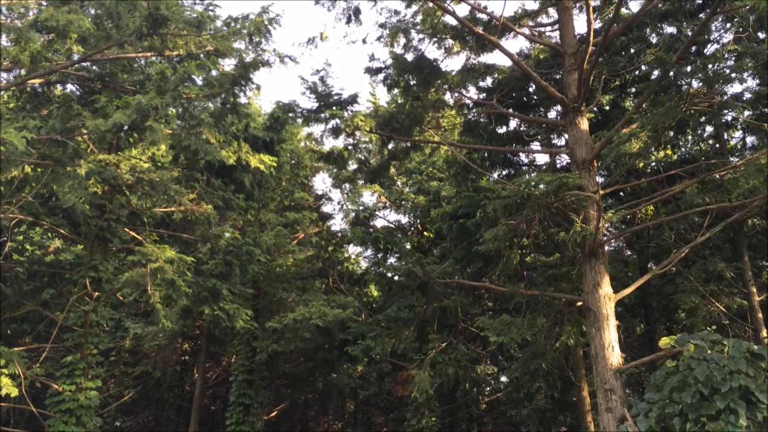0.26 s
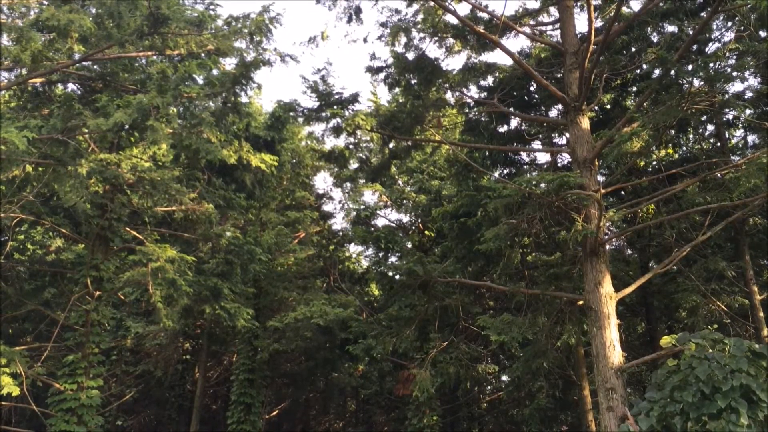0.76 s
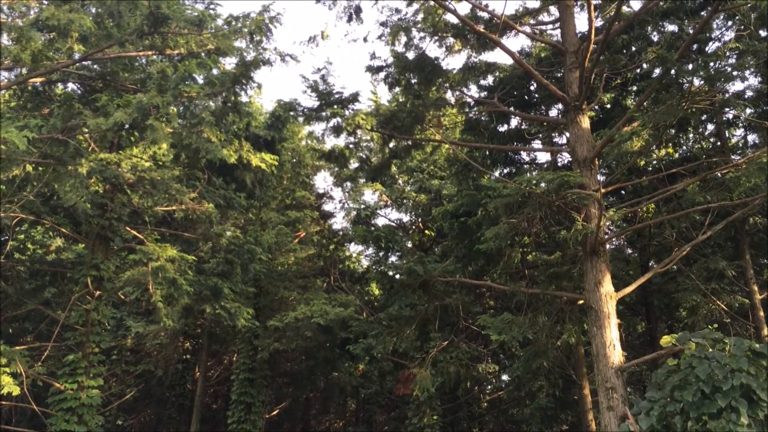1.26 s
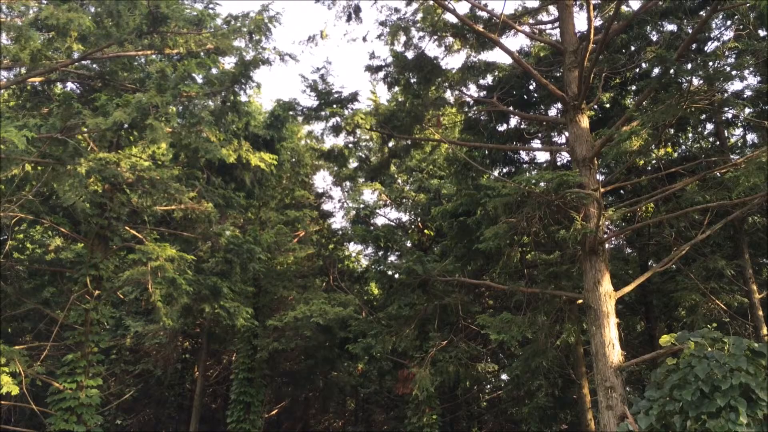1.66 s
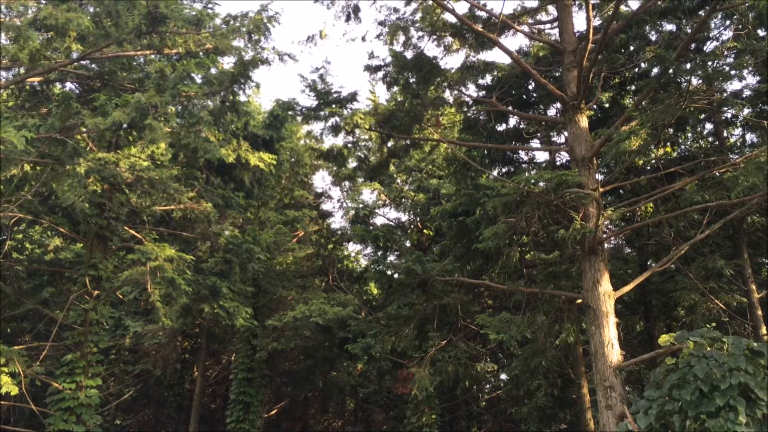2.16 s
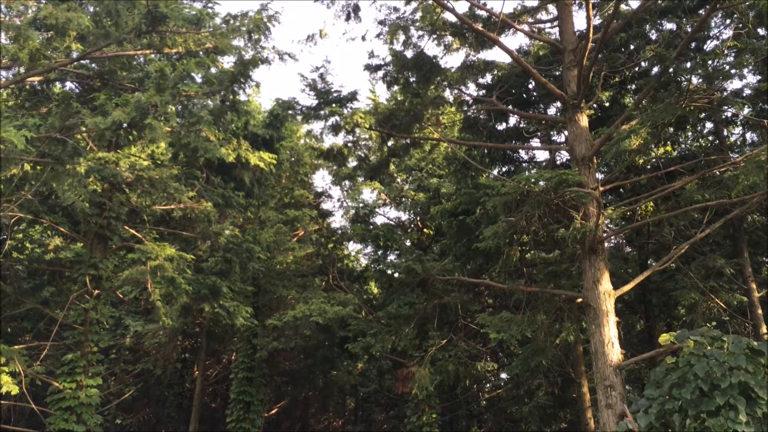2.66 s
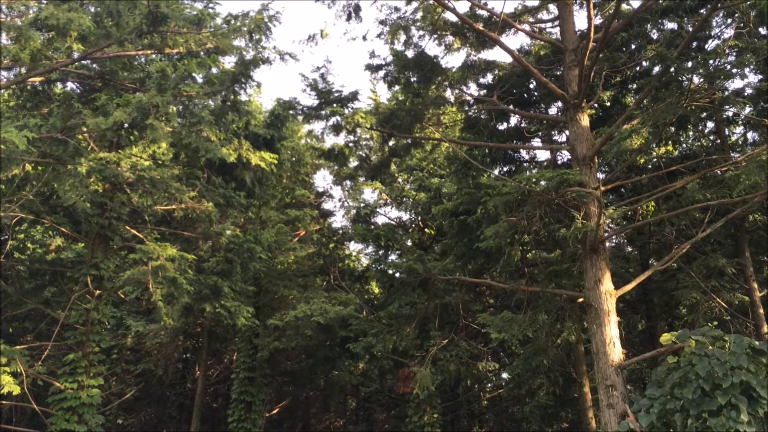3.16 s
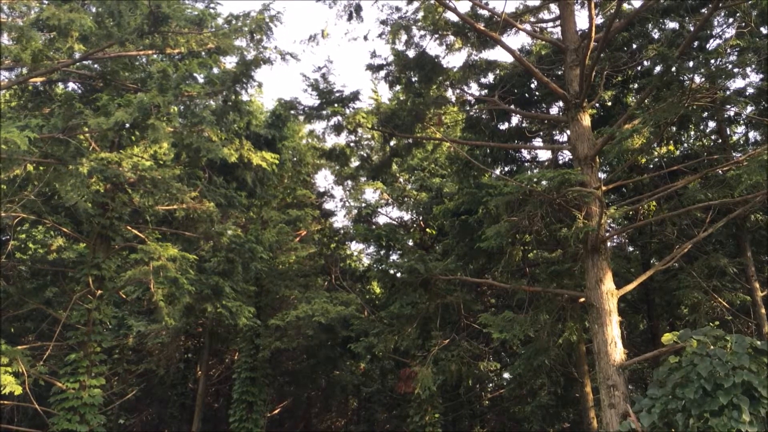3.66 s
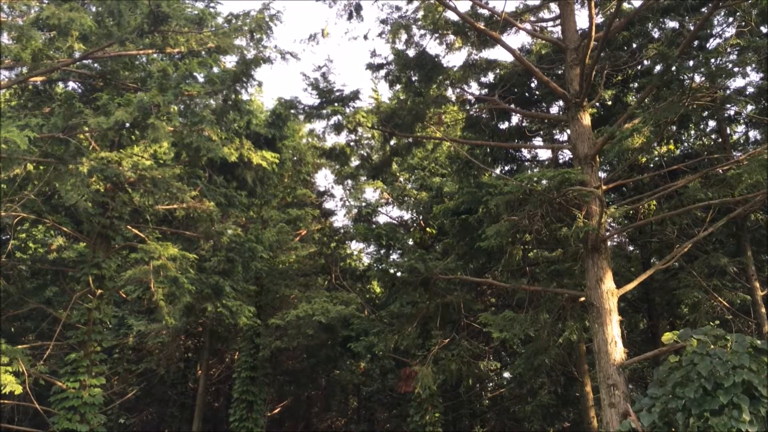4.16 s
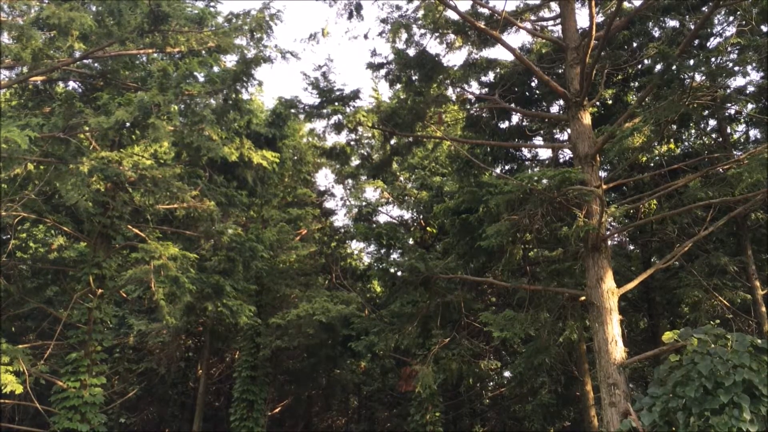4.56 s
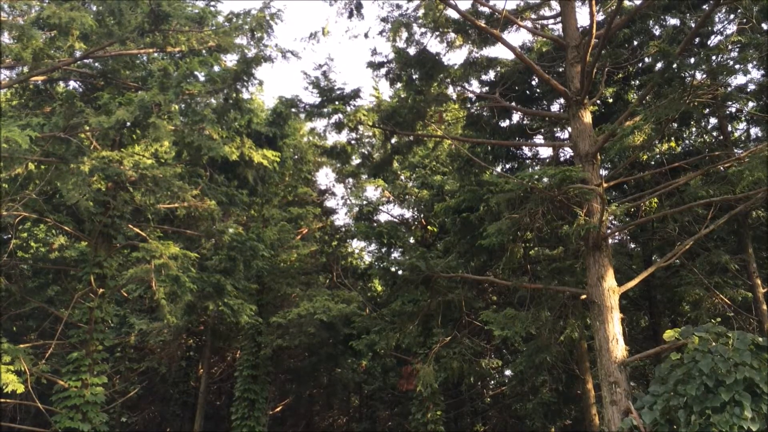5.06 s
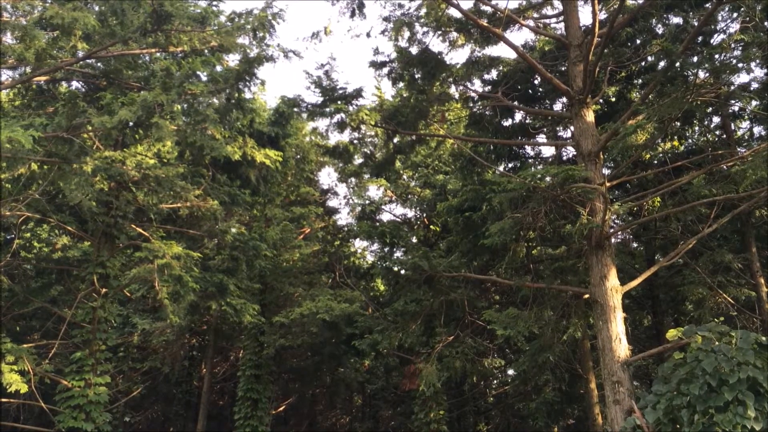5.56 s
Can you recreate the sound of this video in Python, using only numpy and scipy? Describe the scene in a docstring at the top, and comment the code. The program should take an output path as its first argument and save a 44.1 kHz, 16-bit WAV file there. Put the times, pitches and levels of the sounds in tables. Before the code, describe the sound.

A blurred, shrill chorus of far cicadas fills the woods while closer ones enter one after another, each with a rapid pulsing trill that slows and dies away. The strongest calls come in the first half, and a fresh group joins near the end. A light wooden tap sounds near the start, and a thin insect whine comes and goes faintly over a soft hush and distant hum.

```python
"""Cicadas in a wood at dusk: buckling ribs click and ring each abdomen. Near ones sing runs of short
syllables that rise, then slow and sink in pitch; many more blur into a far chorus. Trunks scatter the
calls and let them ring on. Underneath: rib rasp, low rumble, a briefly dipping hush, a far machine's
hum, one light knock on wood and another insect's thin whine."""
import sys
import numpy as np
from scipy import signal
from scipy.fft import rfft, irfft
from scipy.io import wavfile
from scipy.ndimage import uniform_filter1d

SR = 44100
rng = np.random.default_rng(int(sys.argv[2]) if len(sys.argv) > 2 else 0)


def dump(signal):
    """Clip the signal to [-1, 1] and save it as 16-bit WAV at the path in sys.argv[1]."""
    limited = np.clip(np.atleast_2d(signal).T, -1, 1)
    pcm = np.round(limited * 32767).astype(np.int16)
    wavfile.write(sys.argv[1], SR, pcm)


N = 255780
TIME_S = np.arange(N) / SR

# body colours: harmonic number, relative level/dB
HIGH_BODY = [(1, -5), (2, 2), (3, -11), (4, -10), (5, -19.5), (6, -30)]
MIDDLE_BODY = [(1, -6), (2, 1.5), (3, -6.5), (4, -7), (5, -18), (6, -33)]
LOW_BODY = [(1, -1), (2, 0.5), (3, -5), (4, -0.5), (5, -3.5), (6, -23)]
LATE_BODY = [(1, -7.5), (2, 3), (3, -2.5), (4, -6), (5, -19), (6, -24.5)]
SLOW_BODY = [(1, 1), (2, -6.5), (3, -1.5), (4, 1), (5, -8), (6, -21.5)]
FAR_BODY = [(1, -1), (2, 2.5), (3, -6.5), (4, -7.5), (5, -19.5), (6, -28.5)]
# call rhythm: start/s, syllables, first gap/s, slowing/(s/syllable), last-gap drag/s
CALL_BEATS = { "fading": (-.43, 9, .115, 0, 0), "high": (.648, 20, .09, .0019, .152),
              "middle": (1.3, 17, .0847, .004, .112), "slow": (2.699, 10, .1058, .007, .156),
              "back": (3.726, 11, .0868, .0012, .003), "low": (4.545, 10, .0894, .0084, .015),
              "late": (4.758, 10, .0976, .0019, .02), }
# call effort: base f/Hz, base level/dB, warm-up/s, fade/(dB/s), accent/dB, accent age/s,
# first brightness/dB, target brightness/dB, opening/s
CALL_EFFORTS = { "fading": (2229, -48, 0.1, 8.5, 4, .2, -4, 4, 0.5),
                "high": (2349, -38, .04, 2.8, 4.5, .22, 1.5, 17, 1.9),
                "middle": (2134.5, -33, 0.12, 4, 0.5, 0, -38, 4.5, 0.53),
                "slow": (2233.5, -45, 0.2, 6.5, 0.5, .2, -3.5, 5.5, 1),
                "back": (2190.5, -42, 0.16, -0.5, 3.5, .43, -10, -9, .5),
                "low": (2045, -41, .03, 1.5, 0.5, .2, -9, -2, 0.4),
                "late": (2272, -39, .19, 4, 4, .5, -14, 11, .45), }
# call voice: body, buzz depth, jitter/rad, click sag/rad, syllable/s at a 0.1 s gap,
# stretch exponent, side mode/dB at 0 dB brightness
CALL_VOICES = { "fading": (SLOW_BODY, 0.67, 0.097, 0.28, 0.054, 0.76, -60),
               "high": (HIGH_BODY, .33, .08, .2, .052, .2, -18),
               "middle": (MIDDLE_BODY, 0.32, .2, 0.07, 0.043, 0.25, -60),
               "slow": (SLOW_BODY, 0.46, 0.099, .16, 0.045, 0.56, -60),
               "back": (FAR_BODY, 0.28, 0.33, 0.083, 0.032, .3, -63),
               "low": (LOW_BODY, 0.33, 0.16, 0.024, 0.037, 0.41, -60),
               "late": (LATE_BODY, .4, .09, .15, .05, .4, -60), }
# far chorus swell: t/s, level/dB before trim
CHORUS_SWELL = [(0.0, -43), (0.26, -43.5), (1.57, -38), (2.18, -38), (3.18, -43.5), (3.34, -44), (5.3, -39),
                (5.8, -40.5)]
# rib rasp spectrum: f/Hz, relative density/dB
RASP_SPECTRUM = [(1400, -52), (1850, 11.5), (2500, 3.5), (3200, -6), (4000, -3), (5400, 5.5), (6400, 3.5),
                 (7300, 4), (8400, 10.5), (9000, 1.5), (9500, -15), (10800, 2.5), (11800, -33),
                 (15000, -20)]
# distant rumble and hush of the wood: f/Hz, relative density/dB
HUSH_SPECTRUM = [(20, -31), (40, -14.5), (68, 0.5), (95, -1), (150, -5.5), (220, -5), (300, -11.5),
                 (480, -14.5), (800, -19), (1100, -17), (1500, -19.5), (3000, -28), (10000, -74)]
# far machine hum: f/Hz, level/dB
HUM_TONES = [(93, -66), (213, -65), (366, -74), (538, -82)]
# dips in hush and rasp: t/s, half length/s, gain/dB
HUSH_DIPS = [(.472, .014, -20), (2.0, .008, -5), (2.36, .012, -7), (2.68, .008, -6), (3.05, .03, -4),
             (4.003, .022, -24), (4.215, .007, -7)]
# wood modes: f/Hz, relative level/dB, T60/s
WOOD_MODES = [(635, 4, 0.037), (707, -0.5, 0.034), (940, -5, 0.038)]
# insect whines: peak t/s, half length/s, f/Hz, level/dB
INSECT_WHINES = [(.95, .35, 7636, -60), (2.55, .14, 7510, -63), (3.28, .28, 7505, -64)]

COLD_DB, COLD_FLAT = -7, 0.0202  # calls start soft and flat (share of pitch)
ACCENT_HALF_S, ACCENT_HZ_PER_DB, SINK_HZ_PER_S = .13, 1.5, 26.2
SCOOP, SCOOP_S, DROOP = .012, 0.0093, 0.0077  # syllables start and end flat (shares of pitch)
CHORUS_TRIM_DB = -1.07
SONG_LOW_HZ, TOP_HZ = 1600, 15400


def undb(db):
    """Decibels to gain."""
    return 10 ** (np.asarray(db) / 20)


def unit(x):
    """Scale to rms 1."""
    return x / np.sqrt(np.mean(x ** 2))


def walk(rate_hz, size=N):
    """Smooth random drift, spread about 1."""
    at = np.arange(size) / SR * rate_hz + rng.random()
    knots = int(at[-1]) + 2
    return 1.2 * np.interp(at, np.arange(knots), rng.standard_normal(knots))


def noise(spectrum):
    """Shaped noise, rms 1."""
    hz, db = np.transpose(spectrum)
    bins_hz = np.arange(N // 2 + 1) * SR / N
    gain = undb(np.interp(np.log(bins_hz + 1), np.log(hz), db))
    return unit(irfft(rfft(rng.standard_normal(N)) * gain, N))


def syllable_times(start_s, count, gap_s, slowing_s, drag_s):
    """Onsets and gaps: slowing lengthens each gap, drag mainly the last few."""
    k = np.arange(count - 1)
    gaps_s = gap_s + slowing_s * k + drag_s / (count - 1 - k) ** 2
    return start_s + np.append(0, np.cumsum(gaps_s)), np.append(gaps_s, gaps_s[-1])


def effort(age_s, hz, db, warm_s, fade_db_per_s, accent_db, accent_s, first_db, target_db, opening_s):
    """The singer warms up to an accent, then tires and sinks in pitch while its tone opens."""
    cold = np.exp(-age_s / warm_s)
    lift_db = accent_db * np.exp(-((age_s - accent_s) / ACCENT_HALF_S) ** 2)
    pitch_hz = hz * (1 - COLD_FLAT * cold) + ACCENT_HZ_PER_DB * lift_db - SINK_HZ_PER_S * age_s
    level_db = db + COLD_DB * cold + lift_db - fade_db_per_s * age_s
    bright_db = target_db + (first_db - target_db) * np.exp(-age_s / opening_s)
    return pitch_hz, level_db, bright_db


def tymbal(hz, body, bright_db, buzz, jitter_rad, sag_rad, click_hz=335):
    """The abdomen rings at hz; each rib click swells the tone and pulls its pitch down."""
    size = len(hz)
    click_rad = 2 * np.pi * (np.cumsum(click_hz * (1 + .18 * walk(150, size))) / SR + rng.random())
    ring_rad = 2 * np.pi * (np.cumsum(hz) / SR + rng.random())
    phase_rad = ring_rad - sag_rad * np.sin(click_rad) + jitter_rad * walk(600, size)
    strength = np.exp(buzz * np.cos(click_rad) + .16 * walk(330, size))
    tone = 0
    for harmonic, db in body:
        lift_db = bright_db * np.clip((harmonic - 2) / 3, 0, 1)
        tone = tone + undb(db + lift_db) * np.sin(harmonic * phase_rad)
    return unit(strength) * tone


def cicada(beat, drive, voice, attack_s=0.011, release_s=0.025, bite_db=3):
    """One near call: syllables start bright, scoop up to pitch and lengthen as the rhythm slows."""
    body, buzz, jitter_rad, sag_rad, syllable_s, stretch, side_db = voice
    out = np.zeros(N + SR)
    t = np.arange(SR // 5) / SR
    starts_s, gaps_s = syllable_times(*beat)
    contours = effort(starts_s - starts_s[0], *drive)
    for start_s, gap_s, hz, level_db, bright_db in zip(starts_s, gaps_s, *contours):
        if start_s < 0:
            continue
        length_s = syllable_s * (np.clip(gap_s, .08, .2) * 10) ** stretch
        swell = np.clip(t / attack_s, 0, 1) * np.clip((length_s - t) / release_s + .5, 0, 1)
        droop = DROOP * (t > length_s / 2) * (1 - swell)
        pitch_hz = hz * (1 - SCOOP * np.exp(-t / SCOOP_S) - droop)
        treble_db = bright_db + bite_db * (1 - 2 * t / length_s)
        tone = tymbal(pitch_hz, body, treble_db, buzz, jitter_rad, sag_rad)
        # weak mode a fourth up, clearest in mellow syllables
        side_hz = pitch_hz * 1.34 + 30 * walk(200, len(t))
        side = undb(side_db - bright_db) * swell ** 2 * np.sin(2 * np.pi * np.cumsum(side_hz) / SR)
        i = int(start_s * SR)
        out[i:i + len(t)] += undb(level_db) * swell * (tone + side)
    return out[:N]


def woods(x, direct, wet_db, t60_s, treble_db, build_s=0.018):
    """Trunk echoes build and decay; foliage absorbs their treble."""
    t = np.arange(SR) / SR
    echoes = rng.standard_normal(SR) * (1 - np.exp(-(t / build_s) ** 2)) * undb(-60 * t / t60_s)
    echoes /= np.sqrt(np.sum(echoes ** 2))
    foliage = undb(np.interp(np.arange(SR // 2 + 1), [4700, 11000], [0, treble_db]))
    echoes = irfft(rfft(echoes) * foliage, SR)
    primed = np.concatenate([x[:SR][::-1], x])  # the wood already rings at t = 0
    return direct * x + undb(wet_db) * signal.fftconvolve(primed, echoes)[SR:SR + N]


def chorus(centre_hz, spread, bright_db, count):
    """Far cicadas, each on its own pitch and beat, blurred by echoes."""
    out = 0
    for rank in (np.arange(count) + .5) / count * 2 - 1:
        hz = centre_hz * (1 + spread * np.arctanh(.9 * rank) + .011 * walk(2))
        beat_hz = rng.uniform(7, 10.5) * (1 + 0.0604 * walk(0.97))
        beats = np.cumsum(beat_hz) / SR + rng.random()
        syllables = np.maximum(np.sin(2 * np.pi * beats) + 0.16, 0) * undb(1.04 * walk(0.89))
        out = out + syllables * tymbal(hz, FAR_BODY, 0, buzz=0.13, jitter_rad=0.35, sag_rad=0.13)
    out = unit(woods(out, direct=1.0, wet_db=-1.5, t60_s=0.81, treble_db=-12.5))
    overtones = signal.sosfiltfilt(signal.butter(4, 3000, "high", fs=SR, output="sos"), out)
    return out + (undb(bright_db) - 1) * overtones


def rasp(song, relative_db):
    """Dry rattle of buckling ribs; tracks the song's rms."""
    song_rms = np.sqrt(np.abs(uniform_filter1d(song ** 2, size=1100)))
    return undb(relative_db) * song_rms * noise(RASP_SPECTRUM)


def machine_hum():
    """A far machine: low tones wavering in level and pitch."""
    out = 0
    for hz, db in HUM_TONES:
        gain = undb(db) * (1 + .7 * walk(12))
        out = out + gain * np.sin(2 * np.pi * np.cumsum(hz + 5 * walk(14)) / SR)
    return out


def hush(level_db):
    """Distant rumble and the thin hush of the wood."""
    return undb(level_db) * noise(HUSH_SPECTRUM)


def dip(air, split_hz):
    """The level dips briefly above split_hz; the rumble carries on."""
    dip_db = sum(db * np.exp(-((TIME_S - at_s) / half_s) ** 4) for at_s, half_s, db in HUSH_DIPS)
    rumble = signal.sosfiltfilt(signal.butter(3, split_hz, fs=SR, output="sos"), air)
    return rumble + undb(dip_db) * (air - rumble)


def knock(at_s, gain_db, attack_s=0.0014):
    """A light tap rings damped wood modes."""
    t = np.maximum(TIME_S - at_s, 0)
    ring = sum(undb(db - 60 * t / t60_s) * np.sin(2 * np.pi * hz * t) for hz, db, t60_s in WOOD_MODES)
    return undb(gain_db) * (1 - np.exp(-t / attack_s)) * ring


def insect_whine():
    """Thin, high, wavering tones swell and fade."""
    out = 0
    for peak_s, half_s, hz, db in INSECT_WHINES:
        swell = np.exp(-((TIME_S - peak_s) / half_s) ** 2) * undb(db + 2 * walk(25))
        out = out + swell * np.sin(2 * np.pi * np.cumsum(hz + 8 * walk(53)) / SR)
    return out


def scene():
    """Near singers and far chorus over the wood's background; mono."""
    near = sum(cicada(CALL_BEATS[call], CALL_EFFORTS[call], CALL_VOICES[call]) for call in CALL_BEATS)
    near = woods(near, direct=.9, wet_db=-6.0, t60_s=0.35, treble_db=-0.5)
    far = chorus(centre_hz=2141.3, spread=.04, bright_db=.5, count=14)
    far *= undb(np.interp(TIME_S, *np.transpose(CHORUS_SWELL)) + CHORUS_TRIM_DB)
    # small bodies radiate little below their pitch
    song = signal.sosfilt(signal.butter(6, SONG_LOW_HZ, "high", fs=SR, output="sos"), near + far)
    rattle = rasp(near, relative_db=-14) + rasp(far, relative_db=-10.5)
    air = dip(rattle + machine_hum() + hush(level_db=-58.0), split_hz=300)
    return (song + air + knock(at_s=.615, gain_db=-44) + insect_whine())[None]


def record(dry):
    """Steep low-pass at TOP_HZ."""
    return signal.sosfilt(signal.ellip(10, .2, 80, TOP_HZ, fs=SR, output="sos"), dry)


dry = scene()
out = record(dry)
dump(out)
```